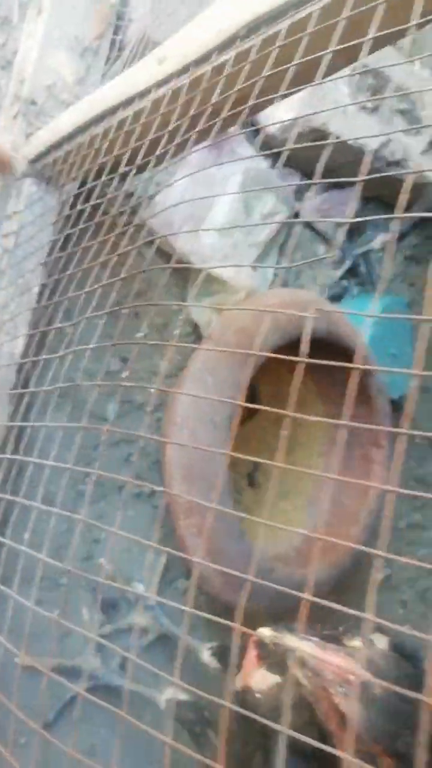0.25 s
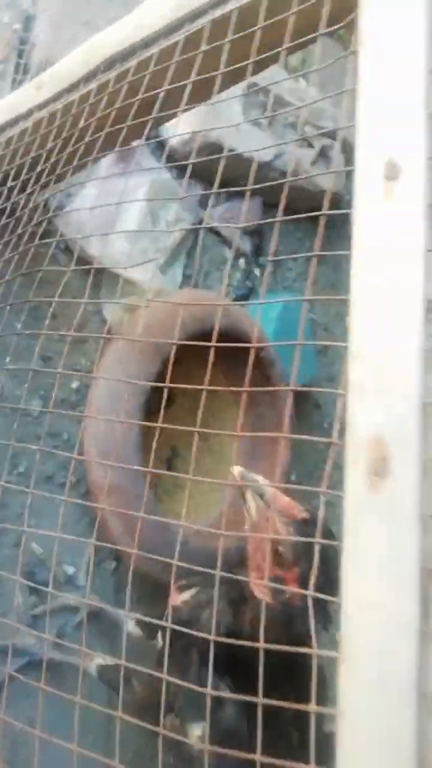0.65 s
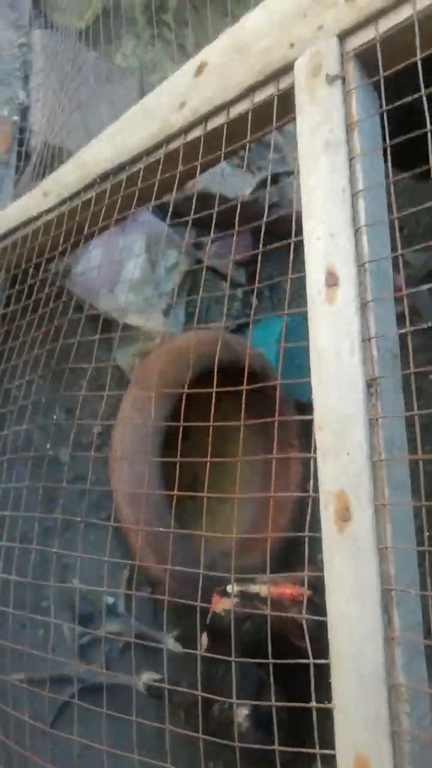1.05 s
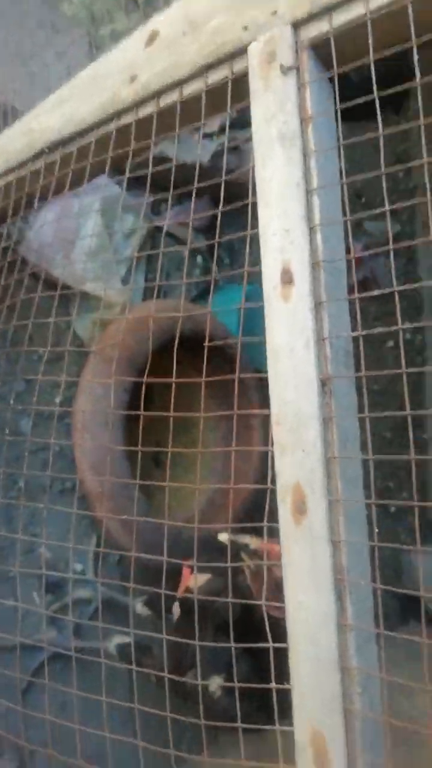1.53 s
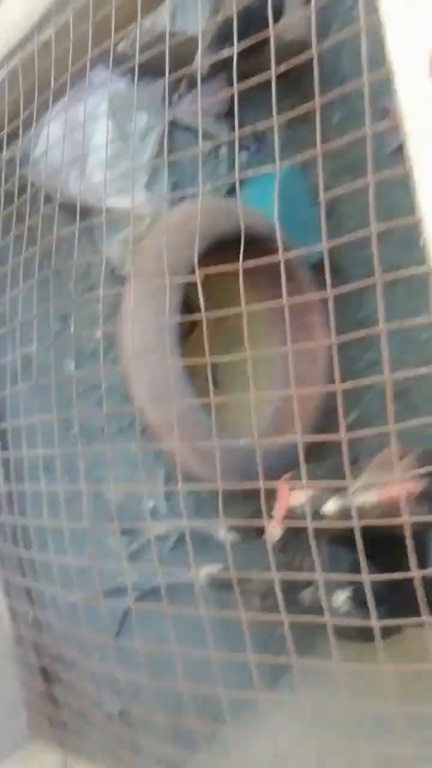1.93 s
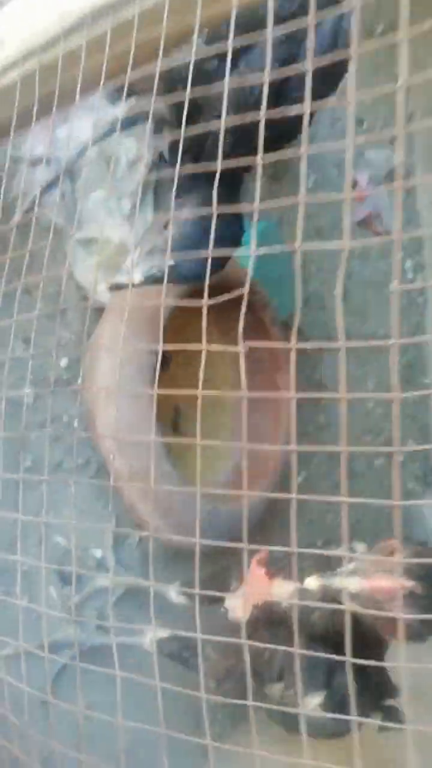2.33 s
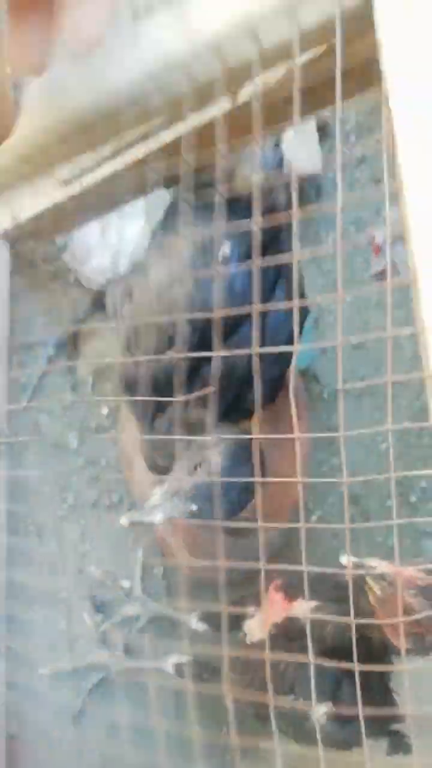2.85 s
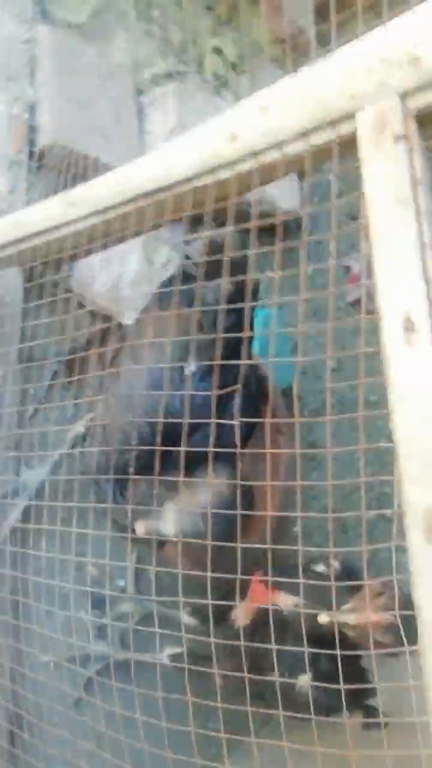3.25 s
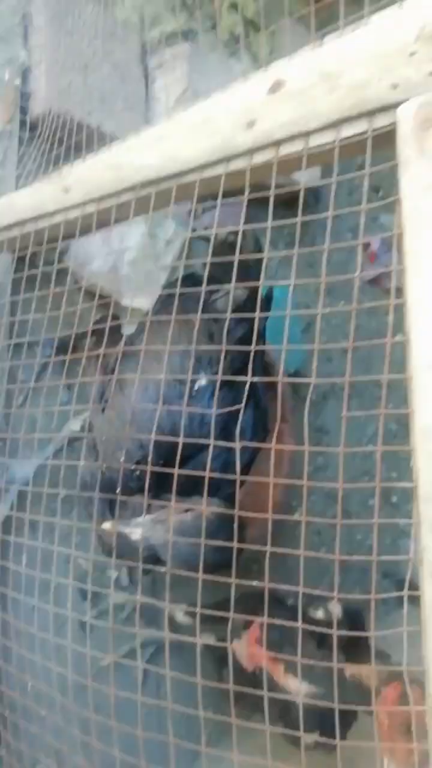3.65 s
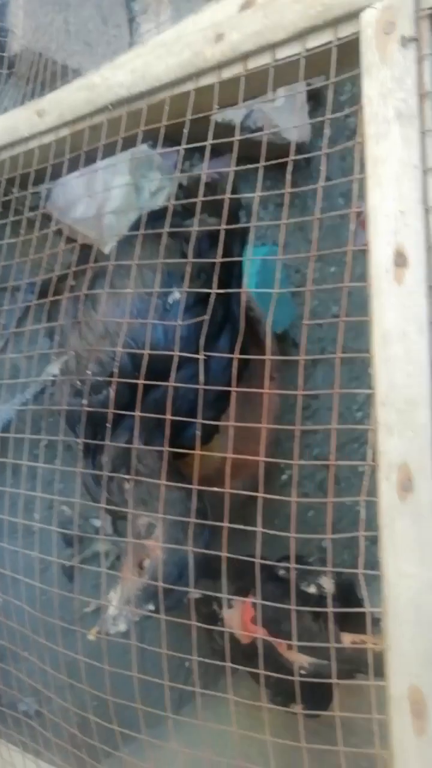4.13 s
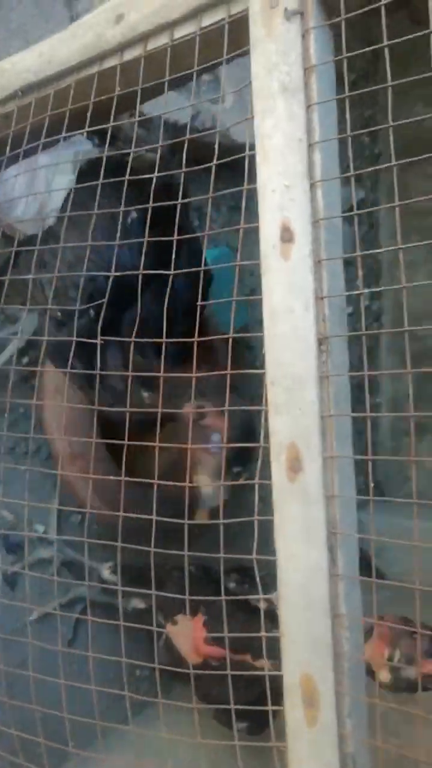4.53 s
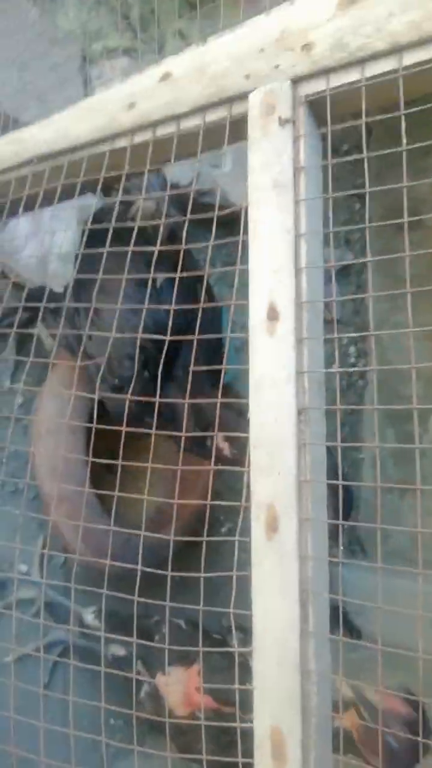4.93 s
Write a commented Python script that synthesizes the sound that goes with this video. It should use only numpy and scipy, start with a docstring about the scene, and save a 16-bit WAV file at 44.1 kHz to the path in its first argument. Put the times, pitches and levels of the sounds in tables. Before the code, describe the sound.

A sharp tick and gritty scratching open the scene, then hens cluck and squawk irregularly throughout. After a quieter middle with a thin whine, rustling feathers and feet grow busier, very sharp claw clicks snap around 3.2 s, and the frame thuds at 3.5 and 4 s. Open rooftop, short echo, light wind buffets on the nearby phone, soft distant rumble.

```python
"""Caged hens on a roof

Hens cluck, squawk and whine in a wire cage close to a phone: harmonic tones and a buzz filtered by a throat.
Feet rustle in grit (granular noise through resonances) and claws tick on ringing mesh (noise, decaying modes).
Sparrows chirp further off (falling trilled sines, mostly echo); thumps excite the modes of a wooden frame.
Below lie the town's rumble, as flickering bands of noise, and low buffets of wind on the phone."""
import sys
import numpy as np
from scipy import signal
from scipy.io import wavfile
from scipy.ndimage import uniform_filter1d

SR = 44100
rng = np.random.default_rng(int(sys.argv[2]) if len(sys.argv) > 2 else 0)


def wrap_up_sound(samples):
    """Save the sound to the file named by the first command line argument, as 16-bit audio."""
    columns = np.atleast_2d(samples).T
    # keep every value between -1 and 1, then stretch to whole-number steps
    tamed = np.clip(columns, -1, 1)
    steps = np.round(tamed * 32767).astype(np.int16)
    wavfile.write(sys.argv[1], SR, steps)


N = 228658
T = np.arange(N) / SR

# Scratching feet: peak t/s, rise/s, fall/s, level/dB; feathers/dB, scuffs/dB, fine dust/dB re that level
SCRATCHES = [(0.01, 0.23, 0.21, -38.5, -6, -13, -16), (0.314, 0.059, 0.25, -39, -10, -11, 20),
             (0.569, 0.055, 0.52, -54.5, -3, -20, -5), (1.602, 0.19, 0.12, -53.5, -1, 8.5, -1),
             (2.282, 0.068, 0.081, -37, -25, -6, 23.5), (2.6, 0.37, 0.84, -46, -22, -5.5, 12),
             (2.799, 0.26, 0.32, -37.5, -5.5, -1.5, 18), (3.245, 0.47, 0.16, -40, 6.5, 1.5, 8),
             (3.64, 1, 0.38, -48.5, 4.5, 1, 0), (4.006, 0.18, 0.19, -49, 2.5, 0.5, 12),
             (4.3, 0.24, 0.21, -43, 3, -0.5, 13.5), (4.45, 0.1, 0.15, -42.5, -1.5, 5, 19.5),
             (4.759, 0.2, 0.65, -46, 1, 1, 12), (5.03, 0.11, 0.44, -46, 4, -2.5, 21)]
# Faint shuffle between scratches: level/dB; feathers/dB, scuffs/dB, fine dust/dB re that level
SHUFFLE = (-74.5, -5.5, 7, 3)
# Resonances of grit, the last being the fine dust: f/Hz, width/Hz, relative level/dB
GRIT_RESONANCES = [(2940, 1480, 16.5), (5380, 2560, 15), (11000, 1700, -31), (13550, 10600, -1.5)]
# Low resonances of the mesh panel: f/Hz, width/Hz, relative level/dB
PANEL_RESONANCES = [(1226, 320, 3.5), (1970, 120, 5.5), (3240, 150, -5.5)]
# Spectrum of the town: f/Hz, relative density level/dB per Hz
TOWN_SPECTRUM = [(110, 6), (181, 4.5), (320, -14.5), (520, -15.5), (700, -27), (1200, -12), (2500, -26),
                 (4500, -27), (7100, -39), (16000, -32.5)]
# Wind on the phone: t/s, level/dB
WIND_LEVELS = [(0, -33.5), (.15, -47.5), (1., -54.5), (2.5, -50.5), (2.65, -42), (2.73, -47.5), (2.82, -39),
               (3.0, -45), (3.4, -52), (3.9, -57), (4.3, -39.5), (4.5, -48.5), (4.95, -47.5), (5.05, -42),
               (5.18, -54)]
# Claw ticks: t/s, level/dB, tail t60/s, left minus right/dB, ring/dB, low part/dB re scrape
TICKS = [(0.1508, -21.5, 0.1, -17, -39, -43), (0.188, -34, 0.14, -21, -34, -36),
         (0.2876, -7, 0.11, -19, -28, -42), (.295, -10, 0.049, -13, -39, -54),
         (1.5168, -54, 0.25, -21, -28, 17), (2.128, -53, 0.04, 2, -23, 23), (2.6, -45, 1, -6.5, -6, 17),
         (2.736, -32.5, 0.074, -3, -18, 24.5), (2.7431, -27.5, 0.081, -1, -21, 18),
         (2.777, -38.5, 0.4, -6, -22, 18.5), (2.899, -18, 0.065, -4, -29, 4.5),
         (2.9343, -20.5, 0.16, -9, -44, -31), (2.95, -15.5, 0.042, -17, -34, -26),
         (2.9948, -38.5, 0.19, -1, -26, 23.5), (3.0999, -16, 0.11, -1, -9.5, 15),
         (3.1442, -28, 0.16, 2, -30, 11), (3.1685, -5, 0.025, -13, -55, -10),
         (3.199, 2, 0.021, -12, -24.5, -3), (3.203, -9, 0.091, -3, -35, 5),
         (3.225, -24, 0.042, -19, -35, 11), (3.285, -25.5, 0.12, -20, -9.5, -21),
         (4.2415, -32.5, 0.1, -4, -1.5, 14), (4.325, -40, 0.12, -1, -8, 24),
         (4.4179, -25, 0.3, -6.5, -24, 2), (4.8278, -47, 0.065, -7, -19.5, 27),
         (5, -33.5, 0.63, -3, -8, 12)]
# Modes of the mesh wire: f/Hz, level/dB, t60/s
MESH_MODES = [(9905, -5, .08), (10120, -13, .06), (12030, -12, .08), (14720, -17, .06), (15350, -6, .08)]
# Hoarse squawks: peak t/s, rise/s, fall/s, pitch f/Hz, sag (share), level/dB, throat f/Hz at peak, at end
SQUAWKS = [(.386, 0.013, 0.012, 615, 0.067, -17, 2110, 2000),
           (0.612, 0.015, 0.03, 485.5, 0.042, -20.5, 1810, 1740),
           (0.967, 0.0093, 0.043, 786, 0.049, -21, 1920, 2110),
           (1.59, 0.046, 0.013, 490, 0.014, -28, 1460, 1440),
           (1.655, 0.05, 0.14, 568, 0.074, -33, 2015, 1960),
           (1.698, 0.035, 0.085, 454.5, -0.216, -35.5, 1350, 1660),
           (1.815, 0.14, 0.044, 609.3, -0.065, -24, 1573, 1970),
           (2.133, 0.011, .012, 509, -0.063, -36.5, 2130, 2030),
           (2.315, 0.032, 0.043, 554, 0.12, -36, 2400, 2170),
           (2.905, 0.038, 0.031, 557, 0.017, -34, 2430, 2930),
           (3.024, 0.015, 0.016, 527, -0.014, -38, 2050, 2100),
           (3.232, .03, 0.03, 491, 0.16, -30.5, 2000, 1980),
           (3.324, 0.035, 0.031, 478.4, 0.11, -33, 2200, 2150),
           (3.458, 0.011, 0.023, 550, 0.089, -28, 1760, 2340),
           (3.779, 0.016, 0.034, 507, 0.055, -18, 1803, 1700),
           (4.043, 0.019, 0.031, 550, 0.053, -31.5, 2430, 2190),
           (4.193, 0.022, 0.048, 449, 0.35, -30.5, 2380, 2290),
           (4.338, 0.027, .05, 474, 0.16, -32, 2550, 2080),
           (4.492, 0.024, 0.052, 489.4, 0.17, -31, 2650, 2140),
           (4.69, 0.029, 0.042, 578.6, 0.19, -32, 2090, 1980),
           (4.898, 0.0083, 0.03, 493, 0.13, -22.5, 1950, 2230)]
# Falling clucks: peak t/s, length/s, pitch f/Hz, fall (share), level/dB;
# second harmonic/dB and half lines/dB re the fundamental
CLUCKS = [(0.3934, 0.021, 1884, 0.564, -19, -28, -33), (0.401, 0.035, 1154, 0.52, -24, -7.5, -14),
          (0.631, 0.045, 1173, 0.42, -24, -11, -12), (1.008, 0.041, 1182, 0.39, -23.5, -8.5, -25),
          (1.182, 0.062, 1129, 0.38, -29.5, -6, -20), (1.608, 0.055, 1102, 0.156, -21, -12.5, -29),
          (1.807, 0.07, 1210, 0.01, -26.5, -19.5, -19), (1.966, 0.05, 1094, 0.06, -26.5, -7, -13.5),
          (2.151, 0.049, 1181, 0.2, -24.5, -12.5, -11.5), (2.328, 0.033, 1100, 0.45, -28.5, -17, -32),
          (2.914, 0.049, 1130, 0.17, -26.5, -13, -10.5), (3.045, 0.043, 1187, 0.23, -23, -12, -12),
          (3.19, 0.024, 1130, 0.37, -33.5, -14, -25), (3.338, 0.044, 1180, 0.41, -27.5, -5.5, -14.5),
          (3.467, 0.057, 1266, 0.343, -26.5, -9.5, -6), (3.804, 0.034, 1124, 0.2, -26, -5.5, -17),
          (4.214, 0.04, 1146, 0.22, -26, -3.5, -9.5), (4.531, 0.011, 1135, 0.1, -30, -8, -20),
          (4.608, 0.029, 1270, 0.036, -21, -7, -7), (4.621, 0.022, 1550, 0.9, -21.5, -27, -19),
          (4.696, 0.064, 1191, 0.31, -30, -12, -27), (4.922, 0.023, 1107, 0.18, -36.5, -8, -16)]
# The long whine: t/s, pitch f/Hz, level/dB, second harmonic level/dB
WHINE = [(1.257, 1027, -68, -82), (1.267, 989, -31.5, -43.5), (1.3, 971, -40.5, -50.5),
         (1.37, 973, -34.5, -42.5), (1.395, 900, -24.5, -46.5), (1.42, 925, -26, -41),
         (1.455, 953, -29, -43.5), (1.468, 1060, -33, -43.5), (1.485, 1020, -52, -61)]
# Overtones of the whine at full effort: multiple of pitch, level/dB re second harmonic
WHINE_OVERTONES = [(3, -12), (4, -18), (5, -20), (6, -28)]
# Direction of the hens: t/s, left minus right/dB, delay of the left port/samples
HENS_DIRECTION = [(0.0, -6, 4), (1.45, -8.5, 1.5), (1.95, 3, -6), (3.3, -4.5, -2), (3.8, 2.5, 4),
                  (4.3, -5, -3.5)]
# Sparrow chirps: t/s, length/s, start f/Hz, end f/Hz, level/dB
CHIRPS = [(0.631, 0.13, 6000, 3550, -40.5), (1.145, 0.16, 5810, 3270, -45.5), (1.76, 0.13, 5900, 3320, -49),
          (3.784, 0.15, 5940, 3570, -43)]
# Thumps on the frame: t/s, level/dB, relative rattle level/dB
THUMPS = [(2.783, -33, 12), (3.244, -30.5, 6.5), (3.481, -11.5, -2.5), (3.558, -19, -3), (3.64, -25.5, 2),
          (4.014, -12.5, 4), (4.285, -19.5, -8), (4.326, -24.5, 3)]
# Modes of the wooden frame: f/Hz, level/dB before the cut toward low modes, t60/s
FRAME_MODES = [(49.4, 10.5, 0.4), (66.7, 0.5, 0.51), (121.7, 5, 0.21), (178.5, 7.5, 0.19),
               (204.5, -8, 0.46), (299.4, -2, 0.25), (408, 12.5, 0.036), (840, -28, 0.078)]

SCRATCH_EDGE_DB, SQUAWK_EDGE_DB = 23.5, 32.5  # drop one rise before the peak and one fall after it
SQUAWK_ROUND = 2.1  # 1 = pointed peak, 2 = round top
SLACK_PITCH, SLACK_THROAT = 0.1444, 0.031  # shares by which pitch and throat start lower
CLIMB_S = 0.01126  # time constant of the pitch's climb
THROAT_WIDTH_HZ = 287
OCTAVE_RATIO, OCTAVE_DB = 2.15, -25  # faint distortion lines about an octave above the loudest overtones
HALF_LINES_DB = -16
EFFORT_SLOPE = .3  # extra dB per dB of effort, for each multiple above the third
BREATH_DB = -15.5  # hiss of air in the whine, re second harmonic
ROOF_T60_S, ROOF_DB, YARD_T60_S = 0.12, -7, 0.3
THUMP_DEPTH_HZ = 60  # lower modes are hardly moved
TOWN_DB = -53.5
TOP_HZ = 16100


def undb(db):
    """Level to amplitude: 20 dB is a factor of ten."""
    return 10 ** (np.asarray(db) / 20)


def unit(x):
    """Normalisation to an RMS value of one."""
    return x / np.sqrt(np.mean(x ** 2))


def band(x, hz, width_hz, order=1):
    """Resonance as a band-pass about a centre frequency."""
    edges = [max(hz - width_hz / 2, 10), min(hz + width_hz / 2, .49 * SR)]
    return signal.sosfilt(signal.butter(order, edges, "bandpass", fs=SR, output="sos"), x)


def walk(rate):
    """Slow random modulation: values held for 1 / rate s, smoothed twice, RMS 1."""
    k = int(SR / rate)
    held = np.repeat(rng.standard_normal(N // k + 1), k)
    return unit(uniform_filter1d(uniform_filter1d(held, k), k)[:N])


def pan(x, db, lag=0):
    """Interaural level and time difference; the left port hears x lag samples late."""
    ports = np.broadcast_to(x, (2, x.shape[-1])) * undb(np.array([[1], [-1]]) * db / 2)
    return np.array([np.roll(ports[0], int(lag)), ports[1]])


def add(out, x, s):
    """Superposition of x on out from time s."""
    i = int(s * SR)
    out[..., i:i + x.shape[-1]] += x[..., :N - i]


def ring(modes, scatter_db, length=SR // 2):
    """Modal response to one blow: decaying sines, weighted anew for every blow."""
    t = T[:length]
    out = 0
    for hz, db, t60 in modes:
        gain = undb(db + scatter_db * rng.standard_normal())
        out = out + gain * np.sin(2 * np.pi * hz * t) * undb(-60 * t / t60)
    return out


def echo(x, t60, delay_s):
    """Diffuse reverberation: convolution with decaying noise, independent at each ear."""
    t = T[:SR // 2]
    tail = rng.standard_normal((2, len(t))) * undb(-60 * t / t60) * (t > delay_s)
    return signal.fftconvolve(x[None], tail / np.sqrt(np.sum(tail ** 2) / 2), axes=1)[:, :N]


def scratching():
    """Addition of powers: each scratch swells and dies away in dB over a faint shuffle."""
    def powers(db, *others_db):
        return undb(db + np.array([0, *others_db]))[:, None] ** 2

    power = powers(*SHUFFLE)
    for s, rise, fall, *db in SCRATCHES:
        distance = np.maximum((s - T) / rise, (T - s) / fall)
        power = power + powers(*db) * undb(-SCRATCH_EDGE_DB * distance) ** 2
    return np.sqrt(power)  # gains of grit, feathers, scuffs and dust


def rustle():
    """Granular excitation: dense tiny grains drive flickering resonances of grit, scuffs and dull feathers."""
    grit_gain, feather_gain, scuff_gain, dust_gain = scratching()
    crackle_db = np.minimum(3.2 * rng.exponential(size=N), 18)
    grains = rng.standard_normal((3, N)) * undb(crackle_db + 1.36 * walk(70) + 1.44 * walk(200))
    grains = 0.64 * grains[0] + 0.77 * grains[1:]  # partly shared by the two ports
    *coarse, dust = [undb(db + 2.2 * walk(25)) * unit(band(grains, hz, width))
                     for hz, width, db in GRIT_RESONANCES]
    coarse = sum(coarse)
    grit = (grit_gain * coarse + dust_gain * dust) / np.std(coarse + dust)
    feathers = unit(band(grains, 812, 1445, order=2)) * feather_gain
    feathers = feathers * undb(1.44 * walk(30) + 1.9 * walk(130))
    panel = sum(band(grains, hz, width) * undb(db - 3.0) for hz, width, db in PANEL_RESONANCES)
    scuffs = unit(band(grains, 1693, 1830, order=2) + panel) * scuff_gain * undb(4 * walk(60))
    return undb(0.5) * pan(grit + feathers + scuffs, 0, lag=7.9)


def town():
    """Coherence falling with frequency: half-octave bands flicker alone, the bass alike at both ears."""
    out = 0
    f, density_db = np.transpose(TOWN_SPECTRUM)
    for hz in 125 * 2 ** np.arange(0, 7.1, .5):
        mid, side = band(rng.standard_normal((2, N)), hz, hz / 3, order=2)
        gain = undb(np.interp(np.log(hz), np.log(f), density_db) + 1.95 * walk(4.98))
        spread = min((hz / 365.0) ** 2, .8)
        out = out + gain * (mid + spread * side * np.array([[1], [-1]]))
    return undb(TOWN_DB) * unit(out)


def wind():
    """Turbulent pressure as low noise; stronger gusts also reach a higher band."""
    gust_db = np.interp(T, *np.transpose(WIND_LEVELS))
    buffet = unit(band(rng.standard_normal(N), 62, 50, order=3)) * undb(gust_db + 1.5 * walk(9))
    flap_db = 1.6 * (gust_db - gust_db.max()) - 37.5 + 1.0 * walk(25.75)
    return buffet + unit(band(rng.standard_normal(N), 163, 64, order=2)) * undb(flap_db)


def ticks():
    """Impact and modal ringing: a crack, a thin snap, a scraping tail and the ring of the wire."""
    out, t = np.zeros((2, N)), T[:SR // 2]
    for s, db, t60, pan_db, ring_db, low_db in TICKS:
        noise = rng.standard_normal((3, len(t)))
        noise = 0.8 * noise[0] + 0.62 * noise[1:]
        tail = undb(-60 * t / t60) * np.minimum(t / 0.0028, 1)
        crack = np.exp(-t / 0.00095) * np.minimum(t / 0.0013, 1)
        high = unit(band(noise, 5650, 4600) + 2.3 * band(noise, 6490, 1270))
        panel = sum(band(noise, hz, width) * undb(g) for hz, width, g in PANEL_RESONANCES)
        low = unit(band(noise, 2690, 2030) + panel)
        scrape = 0.41 * 0.34 * (tail + crack) * (high + undb(low_db) * low)
        snap_shape = 0.18 * np.exp(-t / 0.0032) * np.minimum(t / 0.0017, 1)
        snap = snap_shape * unit(band(noise, 14300, 4500))
        wire = undb(ring_db) * ring(MESH_MODES, scatter_db=3.0)
        tick = pan(snap, 9.9) + pan(scrape, pan_db, lag=rng.normal(10, 14)) + pan(wire, 21.0)
        add(out, undb(db) * tick, s)
    return out


def note(rows, jitter, flutter_db, fade_s=0.0019):
    """Phase as the integral of frequency, with jitter; also a fluttering edge fade and the other columns."""
    s, hz, *columns = np.transpose(rows)
    t = np.arange(s[0], s[-1], 1 / SR)
    wander = uniform_filter1d(rng.standard_normal((2, len(t))), size=120, axis=1) * 11
    pitch = np.interp(t, s, hz)
    phase = 2 * np.pi * np.cumsum(pitch * (1 + jitter * wander[0])) / SR
    fade = np.clip(np.minimum(t - s[0], s[-1] - t) / fade_s, 0, 1) * undb(flutter_db * wander[1])
    return phase, fade * np.sqrt(2), [np.interp(t, s, c) for c in columns]


def squawk_course(s, rise, fall, hz, sag, db, throat_hz, end_hz):
    """Effort governs source and filter: pitch and throat climb, then the pitch shifts and the throat slides."""
    u = np.linspace(-1, 1, 21)  # start, peak at 0, end
    slack = np.abs(u) ** SQUAWK_ROUND
    climb = SLACK_PITCH * np.exp(-(1 + u) * rise / CLIMB_S)
    pitch = hz * (1 - np.where(u < 0, climb, sag * u))
    throat = np.where(u < 0, throat_hz * (1 - SLACK_THROAT * slack), throat_hz + (end_hz - throat_hz) * u)
    return np.transpose([s + u * np.where(u < 0, rise, fall), pitch, db - SQUAWK_EDGE_DB * slack, throat])


def squawks(out):
    """Source and filter: the throat picks a few unsteady overtones out of a buzz."""
    for row in SQUAWKS:
        rows = squawk_course(*row)
        phase, fade, (db, throat) = note(rows, jitter=0.018, flutter_db=0.5)
        k = np.arange(1, 10.1, .5)[:, None]  # half lines arise as alternate cycles differ
        line_hz = k * np.gradient(phase) * SR / (2 * np.pi)
        # each port hears its own unsteadiness, in dB
        unsteady = 42 * uniform_filter1d(rng.standard_normal((2, len(k), len(db))), size=400, axis=2)
        filtered = np.exp(-((line_hz - throat) / THROAT_WIDTH_HZ) ** 2)
        octave = undb(OCTAVE_DB) * np.exp(-((line_hz - OCTAVE_RATIO * throat) / THROAT_WIDTH_HZ) ** 2)
        line_gain = (filtered + octave) * undb(unsteady + 2 * (k % 1) * HALF_LINES_DB)
        buzz = np.sum(line_gain * np.sin(k * phase + k * k + unsteady / 21.0), axis=1)
        rasp = undb(-21) * unit(band(rng.standard_normal(len(db)), np.mean(throat), 1300, order=4))
        add(out, fade * undb(db) * (buzz + rasp), rows[0][0])


def cluck(length, hz, fall, second_db, half_db):
    """Period doubling: alternate cycles differ, giving half lines and rasp, as a short swell sags in pitch."""
    u = np.arange(-.4, .6, 1 / SR / length)
    wander = uniform_filter1d(rng.standard_normal((2, len(u))), size=60, axis=1) * 8
    pitch = hz * np.exp(-fall * np.tanh(3.61 * u) / 2 + 0.017 * wander[0])
    phase = 2 * np.pi * np.cumsum(pitch) / SR
    upper = np.sin(2 * phase) + undb(-14.5) * np.sin(3 * phase + wander[1] / 2)
    upper = upper + undb(-19.5) * np.sin(4 * phase + wander[1])
    rasp = unit(band(rng.standard_normal(len(u)), 1960, 1660, order=3))
    halves = np.sin(3 * phase / 2) + 0.67 * rasp
    # quick swell, slower fade
    shape = np.exp(-np.abs(u / np.where(u < 0, .17, .26)) ** 2.5) * undb(1.5 * walk(90)[:len(u)])
    colour = undb(1.03 * wander[1]) * (undb(second_db) * upper + undb(half_db) * halves)
    return np.sqrt(2) * shape * (np.sin(phase) + colour)


def clucks(out):
    """Superposition of clucks, each from a slightly different side."""
    for s, length, hz, fall, db, second_db, half_db in CLUCKS:
        sound = undb(db) * cluck(length, hz, fall, second_db, half_db)
        add(out, pan(sound, rng.normal(0, 2)), s - .4 * length)


def whine(out):
    """Harmonic enrichment with effort: a near sine whose high overtones come in as the bird pushes harder."""
    phase, fade, (first_db, second_db) = note(WHINE, jitter=0.011, flutter_db=0.1)
    n = len(phase)
    effort_db = first_db - first_db.max()
    upper = np.sin(2 * phase)
    for k, db in WHINE_OVERTONES:
        gain = undb(db + EFFORT_SLOPE * (k - 3.0) * effort_db + 4.6 * walk(82.0)[:n])
        upper = upper + gain * np.sin(k * phase + 0.3 * walk(180)[:n])
    # the air hisses in pulses, once a cycle
    breath = (1 + np.sin(phase)) * unit(band(rng.standard_normal(n), 2900, 1800))
    upper = upper + undb(BREATH_DB) * breath
    add(out, fade * (undb(first_db) * np.sin(phase) + undb(second_db) * upper), WHINE[0][0])


def hens():
    """Direct and reflected sound: calls shift between the two ports, over a short echo of the roof."""
    calls = np.zeros((2, N))
    squawks(calls)
    clucks(calls)
    whine(calls)
    s, pan_db, lag = np.transpose(HENS_DIRECTION)
    late_left = np.interp(T - np.interp(T, s, lag) / SR, T, calls[0])
    direct = pan(np.array([late_left, calls[1]]), np.interp(T, s, pan_db))
    return direct + undb(ROOF_DB) * echo(calls[1], ROOF_T60_S, 0.0047)


def sparrows():
    """Frequency modulation at a distance: husky, trilled whistles fall and arrive mostly as echoes."""
    out = np.zeros(N)
    for s, length, start_hz, end_hz, db in CHIRPS:
        u = np.arange(0, 1, 1 / SR / length)
        trill = .07 * np.sin(2 * np.pi * 60 * u * length)  # 60 Hz
        husk = .045 * walk(250)[:len(u)]
        hz = (start_hz + (end_hz - start_hz) * u) * (1 + trill + husk)
        swell = undb(db + 2.4 * walk(110)[:len(u)]) * np.sin(np.pi * u) ** 1.28
        add(out, swell * np.sin(2 * np.pi * np.cumsum(hz) / SR), s)
    return pan(0.37 * out + echo(out, YARD_T60_S, 0.00031), -8.5)


def thumps():
    """Forced modal response: a ragged push of some 10 ms rings the frame, and loose parts rattle briefly."""
    out, t = np.zeros((2, N)), T[:SR // 2]
    # a blow near a post hardly moves the lowest modes
    reached = [(hz, db - 10 * np.log10(1 + (THUMP_DEPTH_HZ / hz) ** 4), t60) for hz, db, t60 in FRAME_MODES]
    for s, db, rattle_db in THUMPS:
        push = np.abs(rng.standard_normal(len(t))) * np.exp(-t / 0.00064)
        push = push + 0.074 * rng.standard_normal(len(t)) * np.exp(-t / 0.022)
        body = signal.fftconvolve(ring(reached, scatter_db=1.5), push)[:len(t)]
        noise = rng.standard_normal((3, len(t)))
        rattle = unit(band(noise[0] + 2.45 * noise[1:], 625, 830, order=3))
        rattle = 0.33 * rattle * undb(rattle_db - 60 * t / 0.18)
        add(out, undb(db) * (body / np.abs(body).max() + rattle) * np.minimum(t / 0.0058, 1), s)
    return out


def scene():
    """Linear superposition of all sources."""
    return rustle() + town() + wind() + ticks() + hens() + sparrows() + thumps()


def record(dry):
    """Low-pass filtering: the phone cuts the top."""
    return signal.sosfilt(signal.ellip(10, .3, 70, TOP_HZ, fs=SR, output="sos"), dry)


dry = scene()
out = record(dry)
wrap_up_sound(out)
```